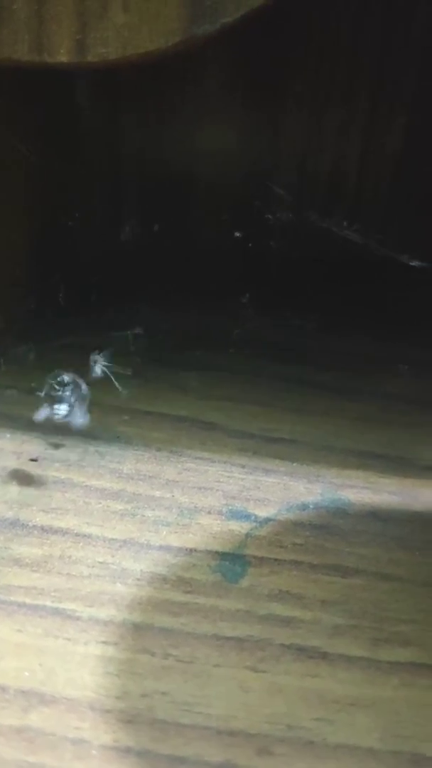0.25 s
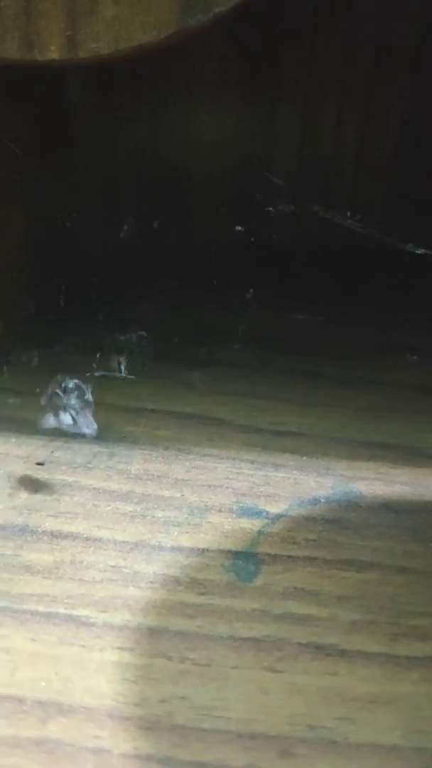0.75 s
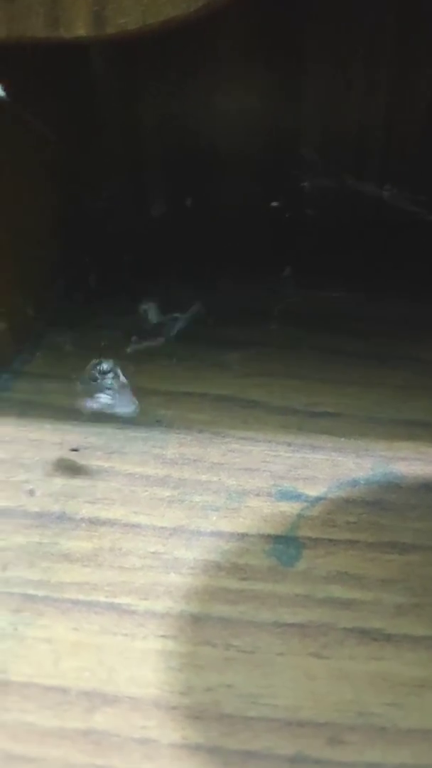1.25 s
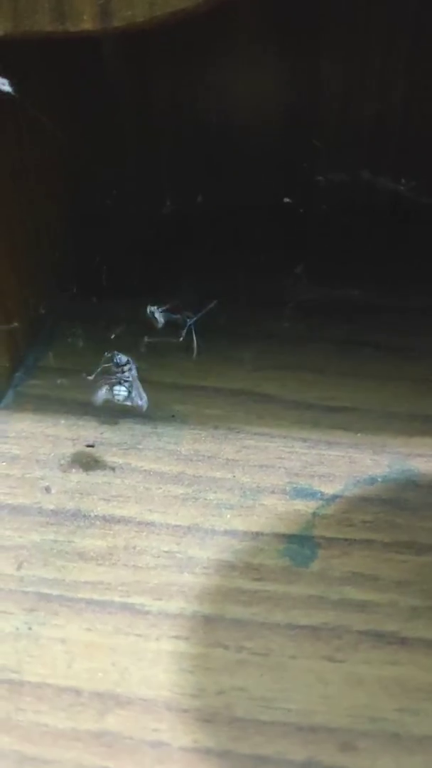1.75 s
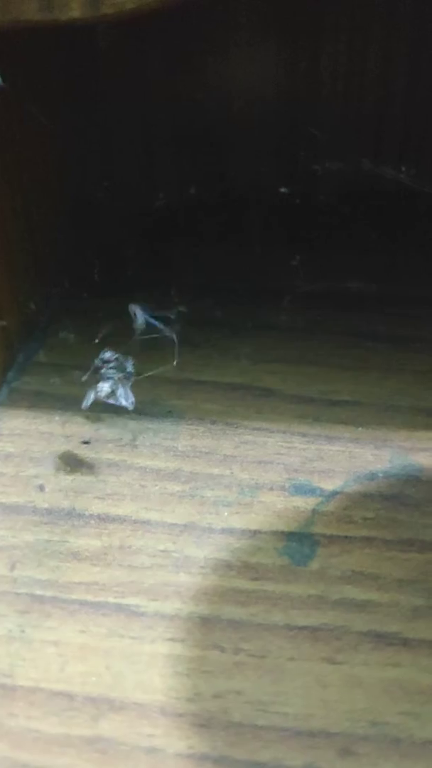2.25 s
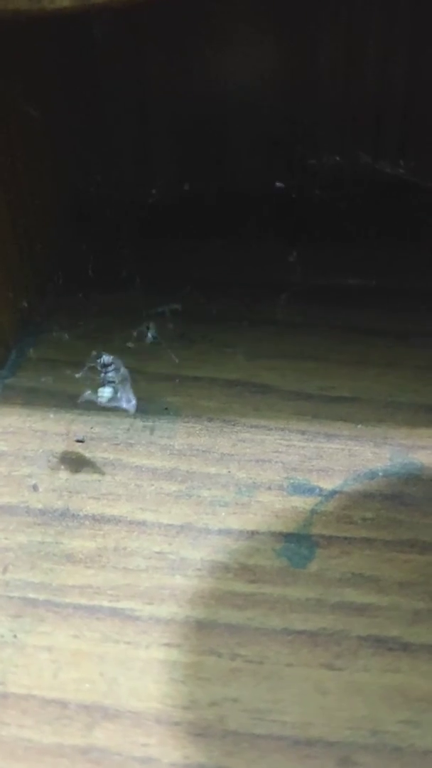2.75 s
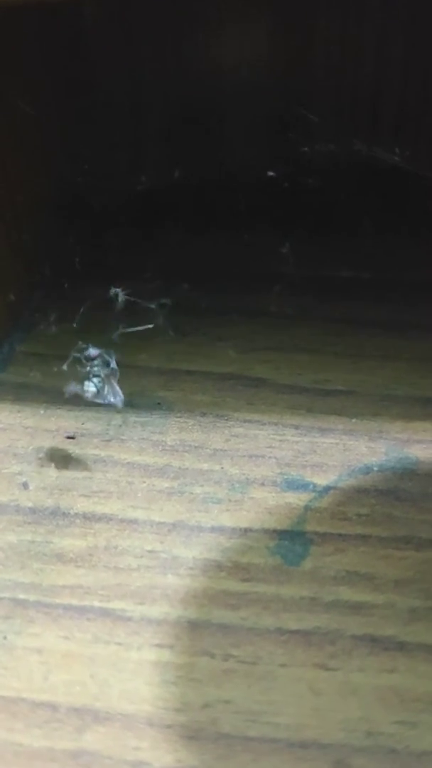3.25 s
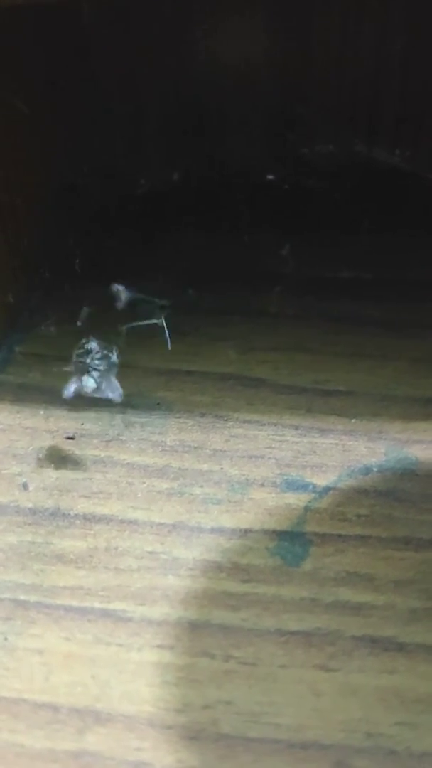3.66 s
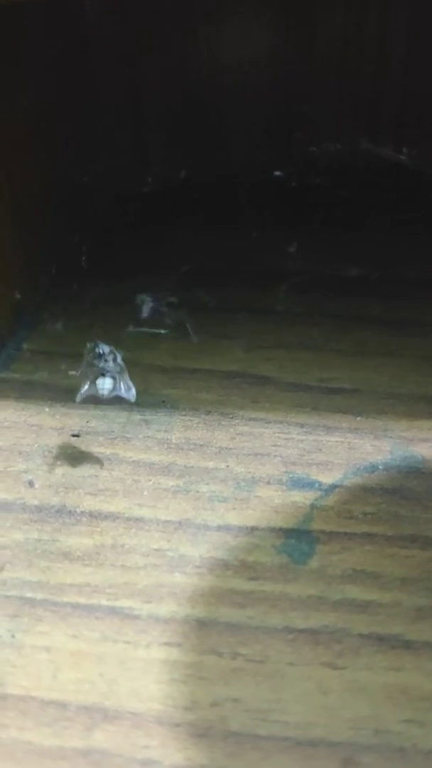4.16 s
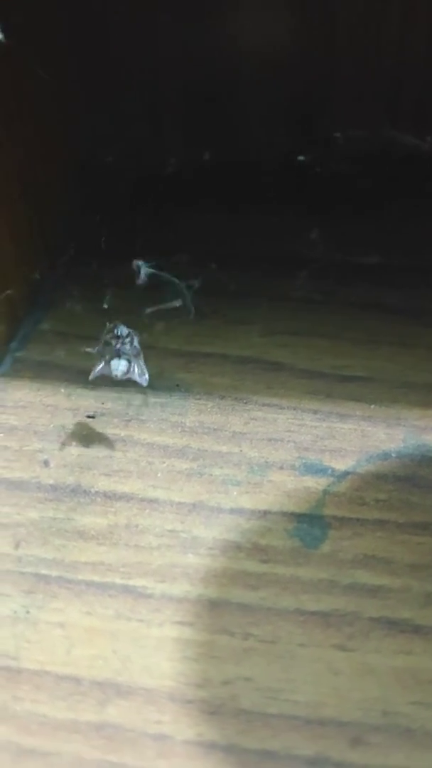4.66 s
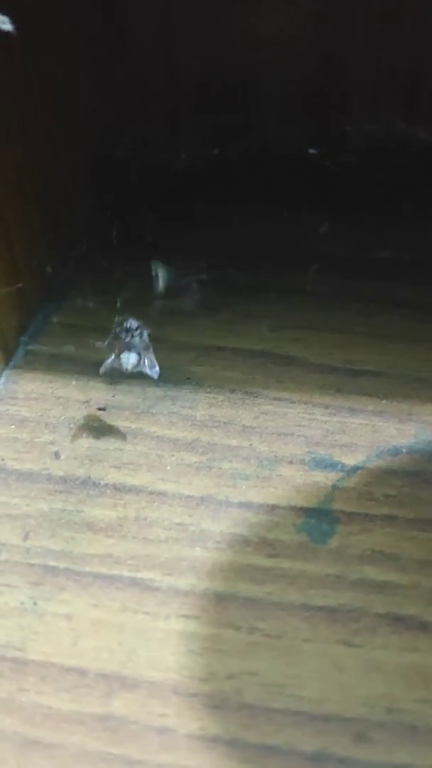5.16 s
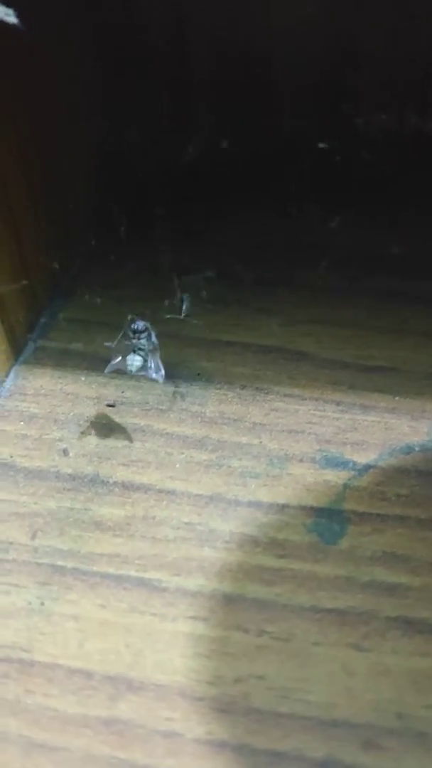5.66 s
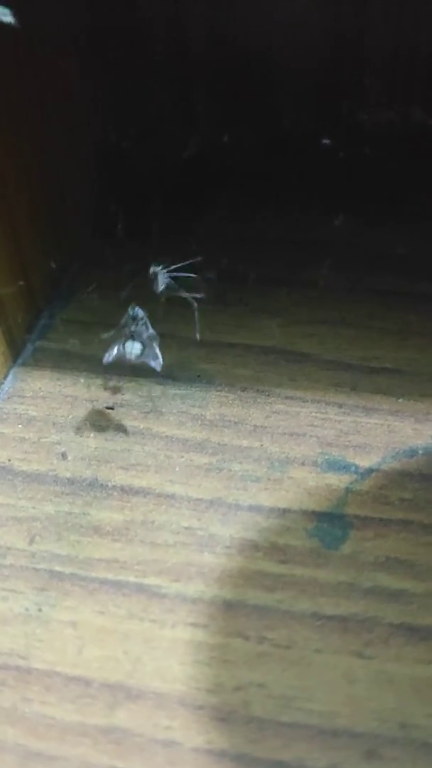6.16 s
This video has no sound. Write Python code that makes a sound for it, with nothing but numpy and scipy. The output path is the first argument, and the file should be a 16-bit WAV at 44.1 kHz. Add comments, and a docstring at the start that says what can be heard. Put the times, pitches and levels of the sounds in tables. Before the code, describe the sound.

A trapped fly buzzes in raspy, uneven fits for four seconds, then stops, while fingers thud and knock against the hand-held microphone.

```python
"""A caught fly buzzes in fits in the corner of a wooden shelf, close to the right microphone port, then falls still:
each wingbeat is a pair of snaps, coloured by the resonances of wings and corner.
Fingers bump the hand-held device at the left port: pressure pulses give thuds and knocks over a low rumble.
Behind lie narrow noise bands: a room hum, a faint high chirping, a distant whine that comes and goes, a late drone."""
import sys
import numpy as np
from scipy import signal
from scipy.fft import rfft, irfft
from scipy.io import wavfile
from scipy.ndimage import uniform_filter1d

SR = 44100
rng = np.random.default_rng(int(sys.argv[2]) if len(sys.argv) > 2 else 0)


def store_pcm(level_fs):
    """Save levels as 16-bit WAV."""
    pcm = np.round(np.clip(level_fs, -1, 1) * 32767).astype(np.int16)
    wavfile.write(sys.argv[1], SR, np.atleast_2d(pcm).T)


N = 282933
TIME = np.arange(N) / SR
FREQ = np.fft.rfftfreq(N, 1 / SR)

# rumble of the grip: (time [s], relative level [dB])
GRIP_LEVEL = [(0, -38.5), (.25, -52), (.46, -59.5), (.86, -50), (1.07, -56), (1.27, -49), (1.95, -52.5),
              (2.3, -42.5), (3.05, -56), (3.42, -46), (3.55, -56), (3.8, -62), (4.2, -54), (4.32, -41.5),
              (5.15, -48.5), (5.4, -38.5), (5.74, -58), (6.42, -70)]
# spectrum shape of that rumble: (frequency [Hz], relative density [dB per Hz])
RUMBLE_SPECTRUM = [(12, -8), (25, 6), (50, 7.5), (100, -5), (200, -20.5), (400, -45), (700, -63),
                   (1500, -91)]
# steady hiss at each port: (frequency [Hz], density [dB per Hz])
HISS_LEFT = [(20, -64.5), (200, -95.5), (400, -99), (700, -108), (1200, -112), (2000, -114), (4000, -117),
             (8000, -118), (16000, -117)]
HISS_RIGHT = [(20, -66.5), (50, -105), (100, -112.5), (200, -101), (400, -102.5), (700, -110),
              (1200, -112.5), (2000, -114.5), (4300, -116), (7500, -114), (11000, -118), (16000, -118)]
# low hum in the room: (frequency [Hz], width [Hz], level [dB])
ROOM_HUM = [(46, 11, -78), (100.3, 6.4, -66.5), (300, 19, -84.5), (387, 17, -83)]
# partials of the distant whine: (frequency [Hz], width [Hz], level before the swells [dB])
WHINE_PARTIALS = [(554.5, 22, -75), (1073, 72, -83), (1685, 33, -87.5)]
# swells of the whine: (start [s], end [s], lift [dB])
WHINE_SWELLS = [(-.2, .4, 2), (4.92, 5.72, 1.5)]
WHINE_FADE_S = 0.59
# fingers bumping the device:
# (time [s], relative thud level [dB], knock level [dB], knock contact time [ms], knock ring [Hz])
FINGER_BUMPS = [(0.017, -32, -13.5, 0.4, 275), (0.0348, -6.5, -12.5, 0.41, 206),
                (0.0537, -19, -38, 0.73, 260), (0.0751, -24, -23.5, 0.35, 210),
                (0.0889, -18, -30, 0.41, 288), (0.161, -35, -51, 0.39, 300), (0.174, -25, -51, 0.34, 347),
                (0.2135, -28.5, -37.5, 0.5, 350), (0.705, -32, -46.5, 0.47, 315),
                (0.786, -30, -21, 0.33, 136), (0.821, -26, -42, 0.45, 1200),
                (1.3454, -31.5, -38, 0.59, 392), (1.64, -37, -51.5, 0.44, 230),
                (2.2008, -32.5, -52, 0.27, 199.9), (2.4, -28.5, -42, 0.4, 337),
                (3.067, -36.5, -43, 0.52, 330), (3.13, -38, -48, 0.69, 270),
                (3.3889, -28.5, -34, 0.39, 222.5), (3.4233, -21, -36.5, 0.38, 810),
                (3.4522, -32.5, -42.5, 0.4, 280.4), (3.47, -25.5, -47.5, 0.263, 292),
                (3.7843, -42.5, -42.5, 0.79, 159.8), (3.938, -39.5, -39.5, 0.51, 278),
                (4.001, -39, -52, 0.7, 250), (4.158, -37, -49, 0.3, 250), (4.1802, -21, -31.5, 0.19, 228),
                (4.197, -27, -40, 0.47, 250), (4.2419, -8.5, -20, 0.68, 285),
                (4.2624, -15, -28.5, 0.402, 290), (4.2993, -19, -27, 0.48, 290),
                (4.3161, -24.5, -28.5, 0.48, 210), (4.375, -34, -31, 0.59, 242),
                (4.396, -19.5, -33.5, 0.44, 280), (4.4124, -22.5, -31, 0.69, 300),
                (4.434, -24.5, -37, 0.33, 229), (4.4436, -23.5, -24.5, 0.48, 262),
                (4.5018, -28, -40.5, 0.38, 263), (4.5437, -29, -43.5, 0.5, 340),
                (4.6521, -13, -20, 0.61, 290), (4.7992, -19.5, -31.5, 0.62, 308),
                (5.4202, -20, -14, 0.38, 296), (5.474, -31, -34, 0.48, 196),
                (5.6136, -29.5, -40.5, 0.31, 343), (5.7332, -35, -39, 0.48, 250),
                (5.8457, -12.5, -15, 0.6, 242), (6.026, -38, -35, 0.3, 255)]
# some contacts make the case sound, a few of them very faintly:
# (time [s], bright tick level [dB], hollow clack level [dB], clack ring [Hz], contact time [ms])
CASE_TICKS = [(.0348, -32, -32, 805, .2), (0.0758, -69, -42.5, 1300, 0.38), (.1055, -64, -56, 1110, .3),
              (.153, -57, -54, 1300, 0.22), (.7856, -66, -53, 734, .39), (4.1802, -67, -31, 1100, 0.44),
              (4.2415, -44, -20.5, 650, 0.47), (4.652, -70, -44, 1480, 0.48),
              (5.8458, -48, -19.5, 1030, 0.25)]
# resonances of the case: (frequency [Hz], width [Hz], relative level [dB])
CASE_MODES = [(3400, 2600, -4), (5984, 770, 15), (12040, 820, 10)]
# rate of the wings, which sags in most of the strong fits: (time [s], beats per second [Hz])
WINGBEAT = [(.2, 248), (.29, 214), (.34, 190), (.37, 205), (.41, 190), (.49, 184), (.54, 149), (.67, 197),
            (.8, 202), (.87, 192), (.92, 214.8), (1.2, 225), (1.48, 158), (1.61, 187), (1.75, 161),
            (1.94, 196), (2.04, 158), (2.25, 196), (2.35, 223), (2.63, 226), (2.77, 190), (2.84, 194),
            (2.92, 159), (3.0, 177), (3.06, 165), (3.17, 172), (3.29, 155), (3.39, 189), (3.48, 144),
            (3.52, 192), (3.69, 178), (3.82, 212), (3.97, 206)]
# resonances of wings and wooden corner: (frequency [Hz], width [Hz], relative level [dB])
CORNER_MODES = [(617, 140, -0.5), (1097, 330, -1.5), (1300, 380, -5.5), (1817, 43, -9), (2400, 155, -5.5),
                (2674, 210, -2.5), (3153, 350, -0.5), (3710, 1600, -13), (5037, 336, -0.5),
                (5640, 540, -5.5), (6730, 760, -4.5), (7390, 430, 3.5), (8090, 1120, 1.5), (9210, 710, -2),
                (10140, 300, -8.5), (11140, 900, -11), (12850, 1600, -17.5)]
# nasal, shrill and fizzy regions lifted or damped by the set of the wings: (centre [Hz], width [Hz])
POSE_REGIONS = [(1350, 550), (7900, 1000), (10700, 2140)]
# fits of struggling, as lifts over the easy buzz: (start [s], end [s], hum [dB], buzz [dB], rasp [dB],
# nasal [dB], shrill [dB], return stroke [dB])
FITS = [(0.219, 0.379, 5, 7.5, 11, 8, 3.5, 4.5), (0.375, 0.488, 1.5, 9, 6.5, 9, -3, 1),
        (0.489, 0.577, 4, 9, 12, 12, -1, 1), (.58, .72, 5.5, 7, 6, 5, 4, 0.5),
        (0.723, 0.877, 2, 7, 1.5, -0.5, 1, 3.5), (1.24, 1.351, 0.5, 5, 6, 5, 0, -0.5),
        (1.352, 1.64, 2.5, 2.5, 7, 11, 6, -2), (1.64, 1.81, 3, 4.5, 8.5, 7, 0, 2.5),
        (1.81, 1.98, 3.5, 2.5, 6, 12.5, 3, -1), (1.979, 2.079, 2, 7.5, 7, 9, 0, -2),
        (2.097, 2.18, -0.5, 3, -0.5, 1, -2, -1), (2.181, 2.367, 2.5, 7, 1.5, -1.5, -1, 1.5),
        (2.37, 2.46, 4, 4.5, 5.5, -3, 4, 3), (2.85, 2.997, 2.5, 2.5, 6.5, 11, 0, -4.5),
        (2.99, 3.191, 2.5, 2.5, 9.5, 9, 9.5, -5.5), (3.19, 3.5, 3.5, 1.5, 5.5, 8, 3, -4),
        (3.5, 3.634, 3, -1, 8.5, 11, 7, -7), (3.669, 3.9, 2, 1.5, 2.5, 0.5, 4.5, 0.5)]
FIT_ATTACK_S, FIT_RELEASE_S = .045, 0.06
# the wings catch for an instant, then kick free: (time they come free [s], length of the catch [s])
STALLS = [(2.103, 0.02), (2.823, .024), (2.847, 0.0068)]
STALL_DB, KICK_DB, KICK_S = -13, 3.5, 0.01
START_S, SPIN_UP_S, STOP_S, RUN_DOWN_S, REST_DB = 0.1, 0.096, 4.01, 0.13, -27
EASY_HZ = 220  # the rate of unhindered wings
# registers and regions: (gain at the easy rate [dB], rise as the beat is dragged down [dB per octave])
HUM_LAW, BUZZ_LAW, RASP_LAW = (-71.5, 2.4), (-71.5, 3.4), (-67, 4.2)
NASAL_LAW, SHRILL_LAW, FIZZ_LAW = (-12, 12.5), (-5, 1), (0.82, 2.1)
RETURN_STROKE = 0.41  # base strength against the main stroke, before the fits change it
# a faint drone that sets in late: (start [s], frequency [Hz], width [Hz], level [dB])
LATE_DRONE = (5.95, 397, 42, -78)
CUTOFF_HZ = 15900


def amp(db):
    """Level: twenty decibels are a factor of ten in amplitude."""
    return 10 ** (np.asarray(db) / 20)


def unit(x):
    """Normalisation: division by the root mean square leaves an rms of 1."""
    return x / np.sqrt(np.mean(x ** 2) + 1e-20)


def curve(rows, count=1):
    """Linear interpolation: column number count of a table is joined by straight lines in time."""
    rows = np.asarray(rows)
    return np.interp(TIME, rows[:, 0], rows[:, count])


def noise(spectrum):
    """Spectral shaping: white noise weighted in frequency takes on a density given in dB per Hz."""
    hz, db = np.transpose(spectrum)
    gain = amp(np.interp(np.log(FREQ + 1), np.log(hz), db))
    return irfft(rfft(rng.standard_normal(N)) * gain, N) * np.sqrt(SR / 2)


def band_noise(hz, width_hz):
    """Narrow-band noise: a Gaussian band of rms 1 round one frequency; round zero, a slow random drift."""
    band = np.exp(-2 * ((FREQ - hz) / width_hz) ** 2)
    return unit(irfft(rfft(rng.standard_normal(N)) * band, N))


def causal(log_gain):
    """Minimum phase: the quickest impulse response with this gain round the full circle of frequencies."""
    return np.fft.ifft(np.exp(np.conj(signal.hilbert(log_gain)))).real


def ring(x, modes, size=4096):
    """Resonance: a causal filter whose power response is the sum of the given modes."""
    f = abs(np.fft.fftfreq(size, 1 / SR))
    power = sum(amp(db) ** 2 / (1 + ((f - hz) / (0.682 * width)) ** 2) ** 2 for hz, width, db in modes)
    response = causal(np.log(power + 1e-9) / 2)[:size // 2]
    return signal.oaconvolve(x, response)[:N]


def gate(t, start, end, attack_s, release_s):
    """Envelope: a rise from 0 to 1 round start, a hold, and a fall back round end."""
    rise = np.clip((t - start) / attack_s + .5, 0, 1)
    return rise * np.clip((end - t) / release_s + .5, 0, 1)


def push(ms, ring_hz, sharpness, roundness, size=4096):
    """Impact: a pressure pulse with a quick rise, which a resonant bass cut makes swing back."""
    f = np.fft.fftfreq(size, 1 / SR)
    pulse = causal(np.maximum(-abs(2 * np.pi * f * ms / 1000) ** roundness, -12))
    s = 1j * np.fft.rfftfreq(size, 1 / SR) / ring_hz
    bass_cut = s * s / (s * s + s / sharpness + 1)
    wave = irfft(rfft(pulse) * bass_cut)
    # the pulse peak is moved to one eighth of the length
    return np.roll(wave, size // 8 - pulse.argmax()) / abs(wave).max()


def add(track, s, wave):
    """Superposition: a push is summed into the track with the peak of its underlying pressure pulse at time s."""
    index = round(s * SR) - len(wave) // 8 + np.arange(len(wave))
    inside = (index >= 0) & (index < N)
    track[index[inside]] += wave[inside]


def grip(level_db=7, lumpy_db=3):
    """Random excitation: the hand's tremor rumbles through the case in uneven lumps."""
    lumps = amp(lumpy_db * band_noise(0, 10.5))
    return amp(curve(GRIP_LEVEL) + level_db) * unit(noise(RUMBLE_SPECTRUM) * lumps)


def nudges(per_s=24, level_db=-3, spread_db=2):
    """Stick and slip: the skin makes tiny slips at random moments, stronger while the grip rumbles."""
    level = curve(GRIP_LEVEL) + level_db + spread_db * rng.standard_normal(N)
    slips = (rng.random(N) < per_s / SR) * amp(level)
    return signal.oaconvolve(slips, push(ms=1.0, ring_hz=169, sharpness=1.6, roundness=1.6), "same")


def room_hum():
    """Superposition of narrow bands: steady low noises add up to the hum of the room."""
    return sum(amp(db) * band_noise(hz, width) for hz, width, db in ROOM_HUM)


def chirping(chirps_per_s=5.1, chirp_s=5.63, chirp_db=-80):
    """Amplitude modulation: a faint high noise band pulses like a cricket's chirp."""
    throb = np.cos(np.pi * chirps_per_s * (TIME - chirp_s)) ** 2 * amp(0.5 * band_noise(0, 5))
    return amp(chirp_db) * throb * band_noise(5750, 420)


def whine():
    """Common envelope: the partials of a distant whine swell and fade together."""
    swell = sum(amp(db) * gate(TIME, start, end, WHINE_FADE_S, WHINE_FADE_S)
                for start, end, db in WHINE_SWELLS)
    return swell * sum(amp(db) * band_noise(hz, width) for hz, width, db in WHINE_PARTIALS)


def bumps(thud_db=1):
    """Contact time sets bandwidth: a soft fingertip thud plus a knock of the case, brighter when shorter."""
    out = np.zeros(N)
    for s, thud, knock, ms, hz in FINGER_BUMPS:
        add(out, s, amp(thud + thud_db) * push(ms=1.595, ring_hz=64.5, sharpness=1.0, roundness=1.71))
        add(out, s, amp(knock) * push(ms=ms, ring_hz=hz, sharpness=2.05, roundness=1.47))
    return out


def ticks():
    """Impulse response: some contacts make the case sound very briefly, as bright ticks and hollow clacks."""
    clicks, clacks = np.zeros((2, N))
    for s, tick, clack, hz, ms in CASE_TICKS:
        clicks[round(s * SR)] = amp(tick)
        add(clacks, s, amp(clack) * push(ms=ms, ring_hz=hz, sharpness=2.0, roundness=1.105))
    peak = abs(ring(1. * (TIME == 0), CASE_MODES)).max()
    return clacks + ring(clicks, CASE_MODES) / peak


def struggle(count, t=TIME):
    """Sum of envelopes: the lift in dB that the fits give at times t, by their column number count."""
    return sum(fit[count] * gate(t, fit[0], fit[1], FIT_ATTACK_S, FIT_RELEASE_S) for fit in FITS)


def dragged(law, t=TIME):
    """Load: a level in dB that follows the octaves by which the wingbeat lies below its easy rate."""
    easy_db, db_per_octave = law
    return easy_db + db_per_octave * np.log2(EASY_HZ / np.interp(t, *np.transpose(WINGBEAT)))


def running(catch_s=.012, free_s=.002):
    """Gain of the wings: they spin up, catch and kick free now and then, and run down to rest."""
    awake = np.clip(np.minimum((TIME - START_S) / SPIN_UP_S, (STOP_S - TIME) / RUN_DOWN_S), 0, 1)
    caught = sum(gate(TIME, s - length, s, catch_s, free_s) for s, length in STALLS)
    kick = sum((TIME > s) * np.exp(-abs(TIME - s) / KICK_S) for s, length in STALLS)
    return (awake > 0) * amp(REST_DB * (1 - awake) + STALL_DB * caught + KICK_DB * kick)


def strokes(turns, phase, jitter_ms, spread_db):
    """Pulse train: one click at a phase of each wingbeat, never quite alike in time or size."""
    at = np.interp(np.arange(1, int(turns[-1])) + phase, turns, np.arange(N))
    late, big = rng.standard_normal((len(at), 2)).T
    at = at + late * jitter_ms * SR / 1000
    # a windowed sinc places each click between samples
    index = at.astype(int)[:, None] + np.arange(-8, 9)
    offset = index - at[:, None]
    click = np.sinc(offset) * np.cos(np.pi * offset / 18) ** 2
    sized = click * amp(spread_db * big)[:, None]
    return np.bincount(np.clip(index, 0, N - 1).ravel(), sized.ravel(), N)


def posed(x, patchy_db, size, twist_db=0.8, twist_hz=16):
    """Time-varying filter: as wings twist, broad regions follow beat and fits, narrow ones flare at random."""
    hz, t, z = signal.stft(x, SR, nperseg=size)
    twist = twist_db * np.interp(t, TIME, band_noise(0, twist_hz))
    nasal = dragged(NASAL_LAW, t) + struggle(count=5, t=t)
    shrill = dragged(SHRILL_LAW, t) + struggle(count=6, t=t) + twist
    fizz = dragged(FIZZ_LAW, t) + twist
    db = sum(np.outer(np.exp(-((hz - centre) / width) ** 4), lift)
             for (centre, width), lift in zip(POSE_REGIONS, (nasal, shrill, fizz)))
    patches = rng.standard_normal(z.shape)
    for _ in range(2):
        patches = uniform_filter1d(patches, size=4, axis=0)
        patches = uniform_filter1d(patches, size=6144 // size, axis=1)
    return signal.istft(z * amp(db + patchy_db * unit(patches)), SR, nperseg=size)[1][:N]


def wing_band(drive, lo_hz, hi_hz, patchy_db, size):
    """Source and filter: one register of the wings, coloured by pose and corner, at an even level."""
    band = signal.butter(3, [lo_hz, hi_hz], "band", fs=SR, output="sos")
    sound = signal.sosfilt(band, ring(posed(drive, patchy_db, size), CORNER_MODES))
    power = uniform_filter1d(uniform_filter1d(sound ** 2, size=1300), size=1300)
    return sound / np.sqrt(abs(power) + 1e-12)


def shelf(x, t60, wet_db, size=3000):
    """Reverberation: a quick decaying scatter of echoes between the shelf's boards."""
    t = TIME[:size]
    taps = rng.standard_normal(size) * amp(-60 * t / t60) * (t > .0007)
    return x + amp(wet_db) * signal.oaconvolve(x, taps / np.linalg.norm(taps))[:N]


def fly(flutter=.013, flutter_hz=60, even_hz=190, scrape=.56, scrape_s=0.00068, waver_db=1.0, waver_hz=20):
    """Periodic impulses: wings snap out and back; the snaps fuse to a hum below and stay a dry rasp above."""
    beat_hz = curve(WINGBEAT)
    unevenness = (even_hz / beat_hz) ** 3  # slower wings beat less evenly
    turns = np.cumsum(beat_hz * (1 + flutter * unevenness * band_noise(0, flutter_hz))) / SR
    main = strokes(turns, phase=0, jitter_ms=0.021, spread_db=0.25)
    back = strokes(turns, phase=.53, jitter_ms=0.058, spread_db=1.5)
    snaps = main + RETURN_STROKE * amp(struggle(count=7)) * back
    # the wing scrapes for an instant after each snap
    contact = signal.lfilter([1], [1, -np.exp(-2 / (scrape_s * SR))], snaps ** 2)
    rough = unit(snaps) + scrape * unit(np.sqrt(contact) * rng.standard_normal(N))
    waver = waver_db * band_noise(0, waver_hz)
    hum_db = dragged(HUM_LAW) + struggle(count=2)
    buzz_db = dragged(BUZZ_LAW) + struggle(count=3) + 0.85 * waver
    rasp_db = dragged(RASP_LAW) + struggle(count=4) + waver
    hum = amp(hum_db) * wing_band(snaps, 410, 2160, patchy_db=2.8, size=1024)
    buzz = amp(buzz_db) * wing_band(unit(snaps) + rough, 2120, 4070, patchy_db=3.5, size=512)
    rasp = amp(rasp_db) * wing_band(rough, 4280, 17000, patchy_db=2.5, size=256)
    return running() * (hum + shelf(buzz + rasp, t60=.035, wet_db=-9))


def drone():
    """Narrow-band noise: a faint drone fades in late over a tenth of a second and stays."""
    start, hz, width, db = LATE_DRONE
    return amp(db) * np.clip((TIME - start) / .1, 0, 1) * band_noise(hz, width)


def scene():
    """Proximity: the fly is loud at the right port and the fingers at the left, each faint at the other."""
    hand = grip() + nudges() + bumps() + ticks()
    far = room_hum() + chirping() + whine() + drone()
    wings = fly()
    left = hand + amp(-57) * wings + amp(-29) * far + noise(HISS_LEFT)
    right = wings + amp(-56) * hand + far + noise(HISS_RIGHT)
    return np.array([left, right])


def record(dry):
    """Band limitation: a linear-phase lowpass sets the recorder's upper limit."""
    lowpass = signal.firwin(511, CUTOFF_HZ, window=("kaiser", 9), fs=SR)
    return signal.oaconvolve(dry, lowpass[None], "same")


dry = scene()
out = record(dry)
store_pcm(out)
```